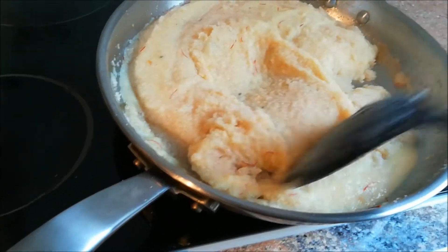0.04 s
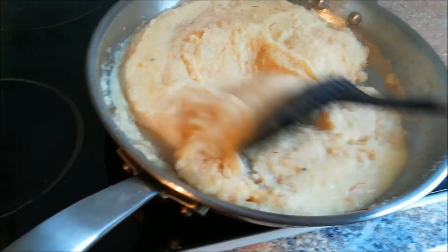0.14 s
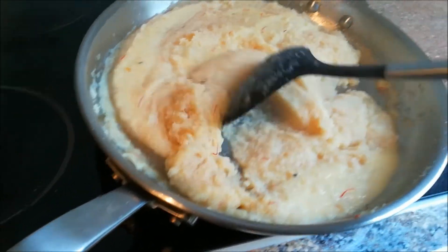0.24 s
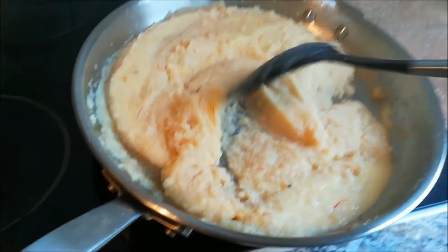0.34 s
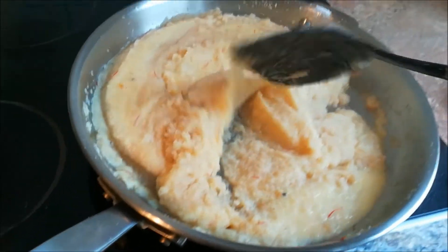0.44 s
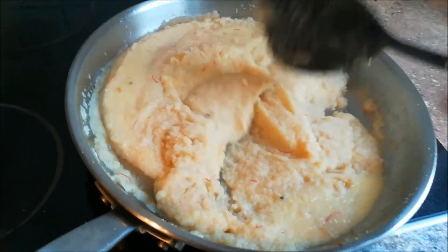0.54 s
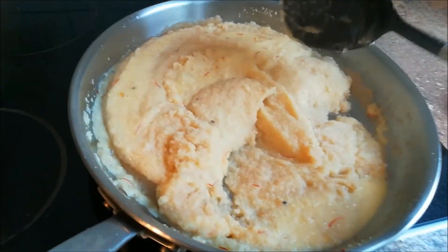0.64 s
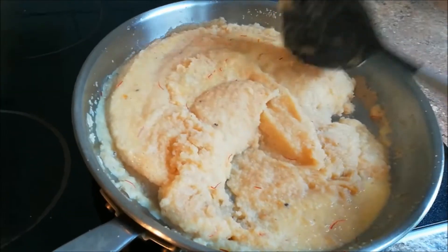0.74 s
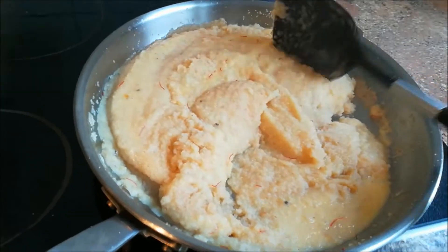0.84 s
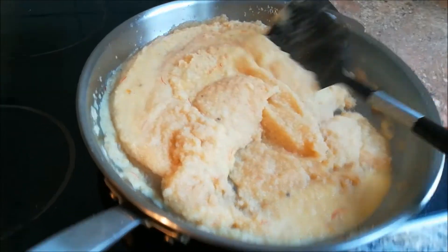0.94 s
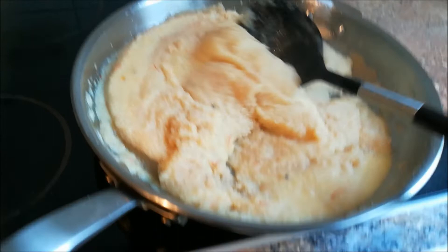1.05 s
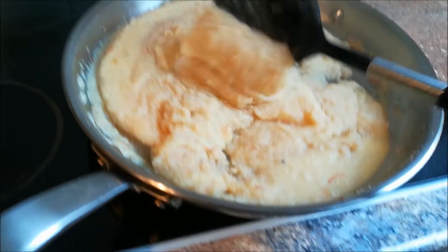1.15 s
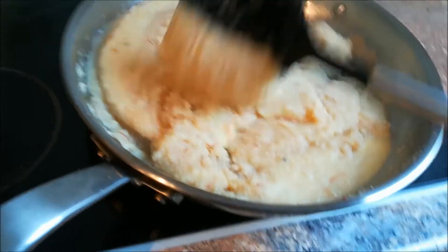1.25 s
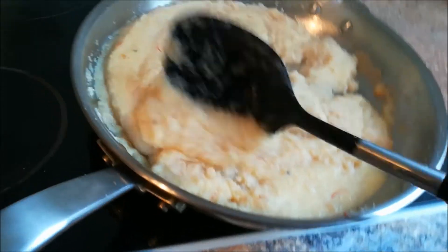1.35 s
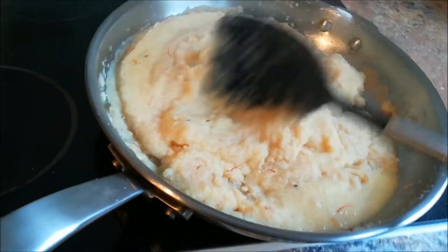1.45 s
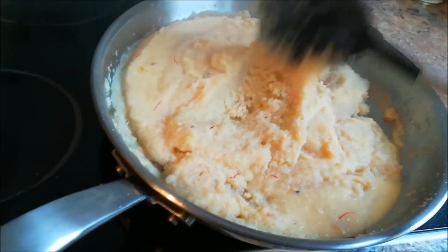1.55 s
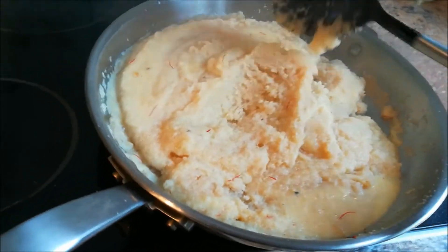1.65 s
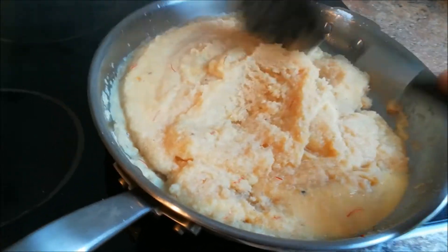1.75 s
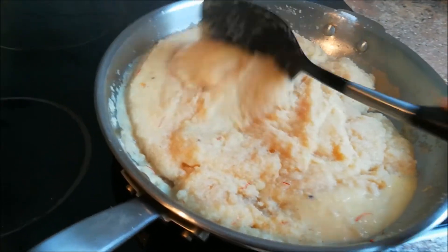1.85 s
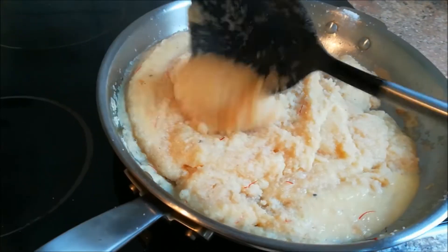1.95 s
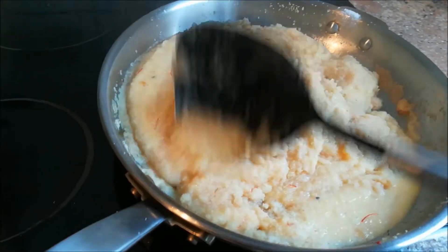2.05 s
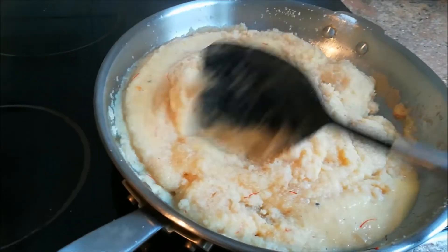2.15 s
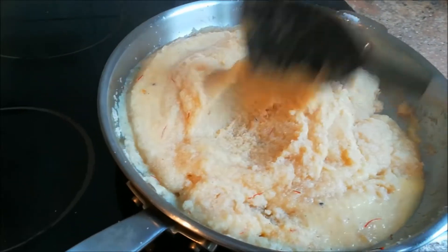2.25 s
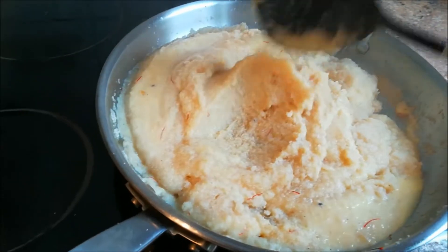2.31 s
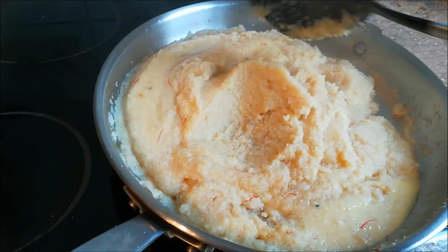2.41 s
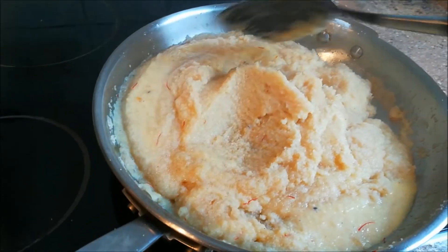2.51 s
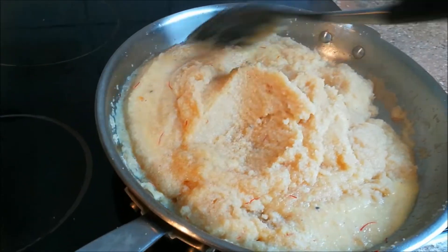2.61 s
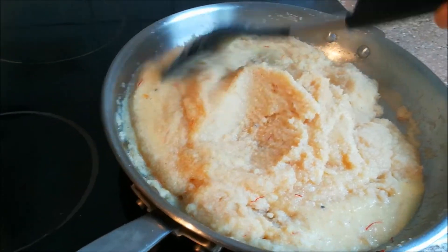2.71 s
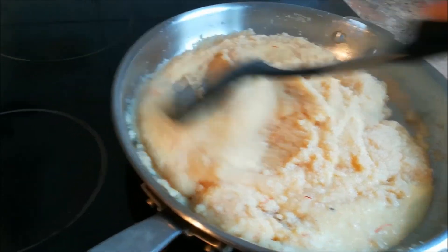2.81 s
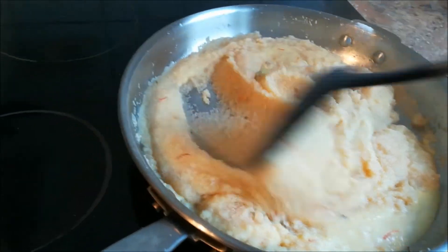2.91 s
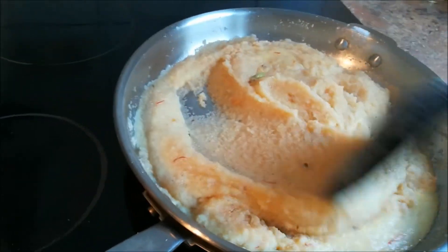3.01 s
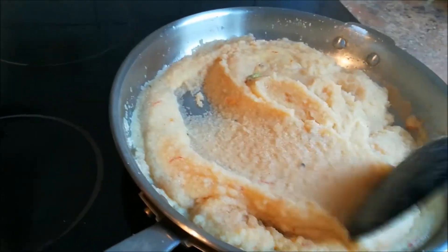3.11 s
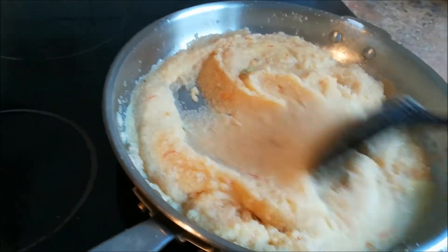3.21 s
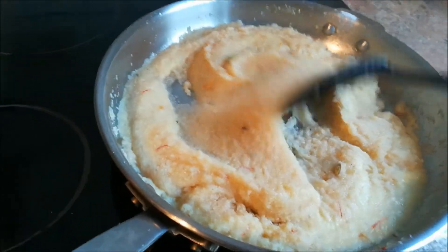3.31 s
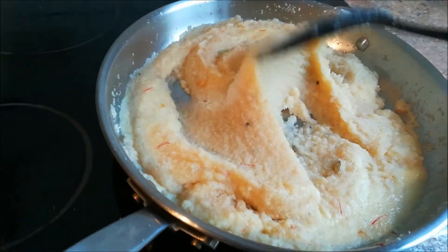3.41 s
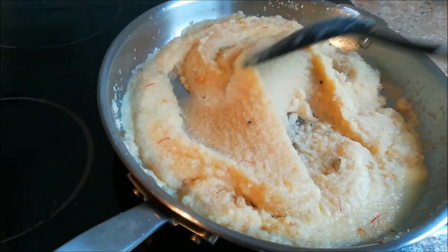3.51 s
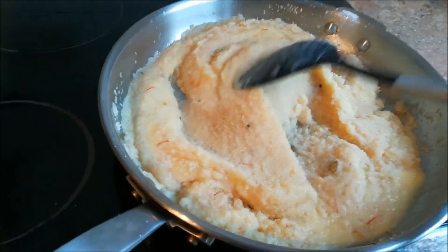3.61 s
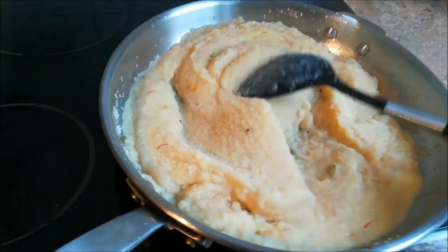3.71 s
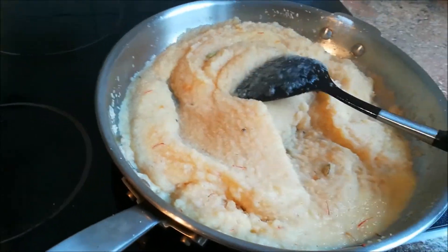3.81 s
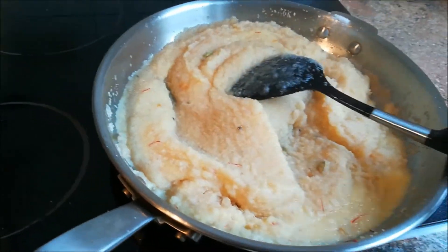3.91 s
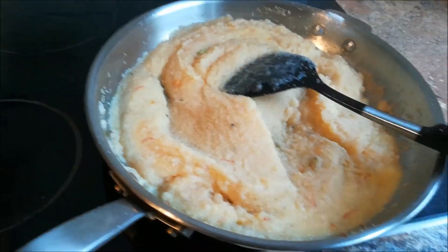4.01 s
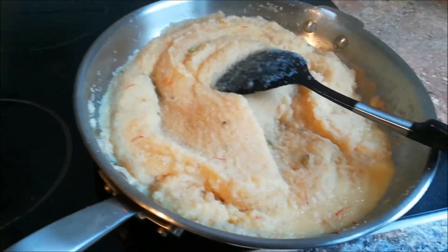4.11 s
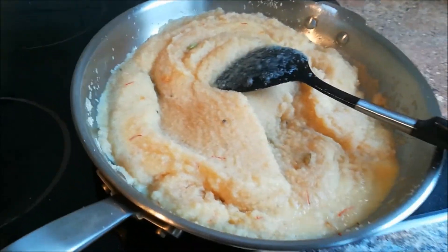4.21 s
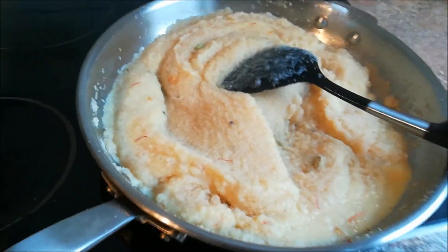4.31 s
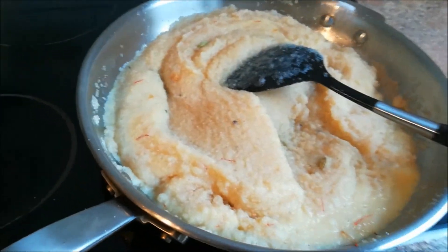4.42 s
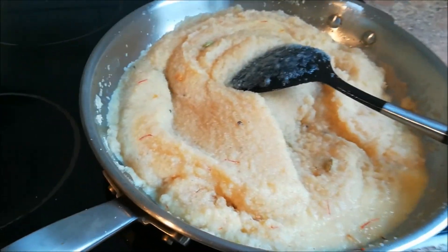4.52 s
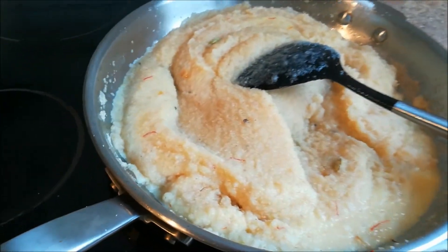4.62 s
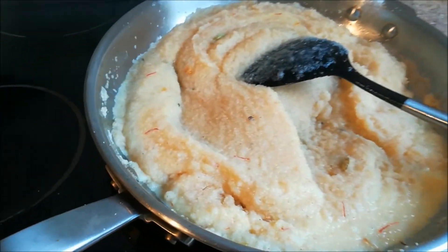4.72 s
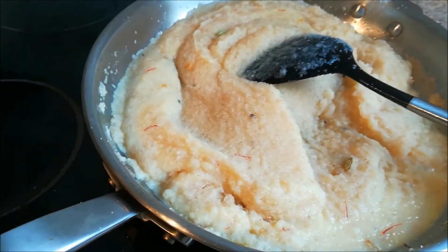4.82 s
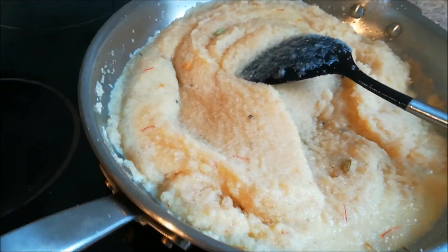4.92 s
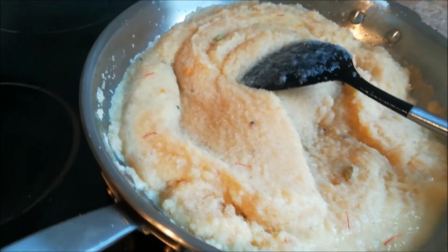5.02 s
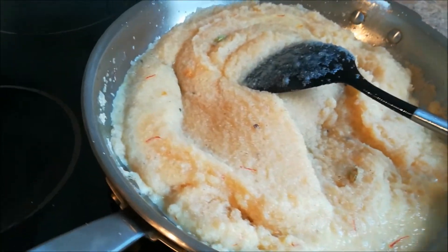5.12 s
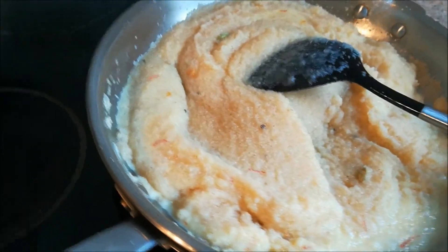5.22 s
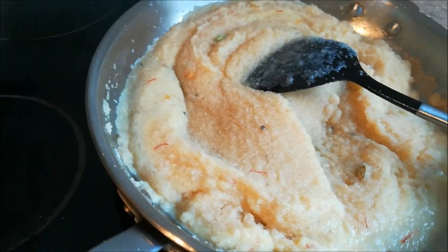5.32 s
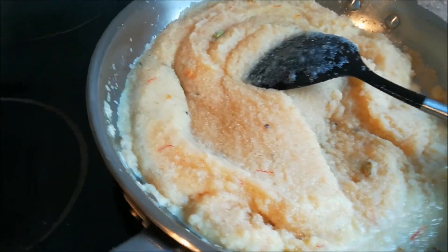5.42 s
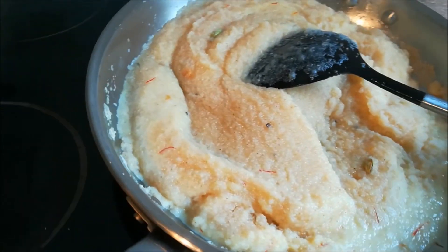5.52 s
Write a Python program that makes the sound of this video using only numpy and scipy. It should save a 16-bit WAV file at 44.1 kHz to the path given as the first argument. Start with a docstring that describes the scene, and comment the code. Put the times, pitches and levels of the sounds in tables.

```python
"""Pudding folded with a plastic spoon in a steel pan, in a small hard kitchen, over fan and fridge hum, whine and air.
From the start the pudding smears (tiny ringing pockets) and ticks (short filtered snaps); five knocks of the spoon,
from 0.16 to 3.24 s, are a noisy crack with damped pan modes; soft low thuds (dying sines) come at 0.17, 3.26 and 3.9 s.
Squelches and squeaks swell from 1.1 s on; a sizzle swells at 3.5 s. Then the pudding rests more quietly, the hum
shifts its balance, and squelches near 4.8 and 5 s lead into even runs of ticking and a last squeak at 5.3 s."""
import sys
import numpy as np
from scipy import signal
from scipy.fft import rfft, irfft
from scipy.io import wavfile

SR = 44100
rng = np.random.default_rng(int(sys.argv[2]) if len(sys.argv) > 2 else 0)


def put_to_file(sound):
    """Save the sound as 16-bit audio at rate SR, in the file named by the first command-line argument."""
    columns = np.atleast_2d(sound).T  # one column per channel
    safe = np.clip(columns, -1, 1)
    whole_steps = np.round(safe * 32767)
    wavfile.write(sys.argv[1], SR, whole_steps.astype(np.int16))


def elevation(decibels):
    """Turn decibel levels (scalar or array-like) into linear amplitude ratios."""
    levels = np.asarray(decibels, float)
    return 10 ** (levels / 20)


N = 244745

FRIDGE_HZ = 49.29   # speed of the fridge motor, turns per s
# stereo balance of diffuse sound: (frequency [Hz], left minus right [dB])
DIFFUSE_BALANCE = [(60, -2), (130, 9), (290, 1), (640, -2.5), (1410, -0.5), (3100, 4), (6820, 2.5),
                   (15000, -5)]
# stereo balance of the pan: (frequency [Hz], left minus right [dB])
PAN_BALANCE = [(60, 0), (130, 2), (290, -12.5), (640, -12), (1410, 0.5), (3100, 12.5), (6820, 5.5),
               (15000, -1.5)]


def rms_one(x):
    """Scale to rms 1."""
    return x / np.sqrt(np.mean(x ** 2) + 1e-20)


def in_time(rows):
    """Columns of a curve table, sample by sample."""
    s, *columns = np.transpose(rows)
    return [np.interp(np.arange(N) / SR, s, column) for column in columns]


def at_hz(points, hz):
    """A table read on a log-frequency axis."""
    table_hz, values = np.array(points).T
    return np.interp(np.log(hz), np.log(table_hz), values)


def drift(rate_hz):
    """Slow random wandering of spread 1: noise at a fortieth of the sample rate, smoothed by a double pole."""
    r = np.exp(-80 * np.pi * rate_hz / SR)
    noise = rng.standard_normal(N // 40 + 4002)
    slow = signal.lfilter([1], [1, -2 * r, r * r], noise)[4000:]   # skip the filter's run-in
    return np.interp(np.arange(N) / 40, np.arange(len(slow)), rms_one(slow - slow.mean()))


def ring(clicks, hz, t60):
    """A two-pole resonance: a unit click sets a sine ringing that falls 60 dB in t60 seconds."""
    r, w = elevation(-60 / (t60 * SR)), 2 * np.pi * hz / SR
    return signal.lfilter([0, np.sin(w)], [1, -2 * r * np.cos(w), r * r], clicks + 1e-18)


def tone(turns, level_db):
    """A sine of given rms level following a phase in turns."""
    return np.sqrt(2) * elevation(level_db) * np.sin(2 * np.pi * (turns + rng.random()))


def coloured(x, points):
    """Minimum-phase filter with the given (Hz, dB) response, so that nothing sounds early."""
    size = x.shape[-1]
    bins_hz = np.maximum(np.arange(size // 2 + 1) * SR / size, 1)
    cepstrum = irfft(at_hz(points, bins_hz) * np.log(10) / 20, size)
    cepstrum[1:size // 2] *= 2
    cepstrum[size // 2 + 1:] = 0
    return irfft(rfft(x) * np.exp(rfft(cepstrum)), size)


def swell(s, rise_s, fall_s, db):
    """Power that grows to a peak and dies away, both exponentially; the times are those of amplitude to 1/e."""
    t = np.arange(N) / SR - s
    return elevation(db) ** 2 * np.exp(2 * np.where(t < 0, t / rise_s, -t / fall_s))


def mixed(parts):
    """Level in dB and pitch of (power, Hz) parts: the loudest pulls the pitch."""
    power = sum(p for p, hz in parts)
    return 10 * np.log10(power), np.exp(sum(p * np.log(hz) for p, hz in parts) / power)


def lean(table, hz):
    """Left and right gains at a pitch."""
    return elevation(np.array([[.5], [-.5]]) * at_hz(table, hz))


def diffuse_bands(length, low_hz, high_hz):
    """Third-octave bands of stereo noise, each with its own likeness and balance of left and right."""
    # edges of the third-octave bands: (frequency [Hz])
    edges_hz = 20 * 2 ** np.arange(0, 9.9, 1 / 3)
    # left-right likeness of diffuse sound: (frequency [Hz], correlation [-1 to 1])
    likeness = [(60, 1.0), (130, 0.98), (290, 0.56), (640, -0.32), (1410, 0.51), (3100, -0.39),
                (6820, -0.15), (15000, -0.58)]
    white = rng.standard_normal((2, 2, length))
    for k, (low, high) in enumerate(zip(edges_hz, edges_hz[1:])):
        if low_hz < low < high_hz:
            band = signal.butter(2, [low, high], "band", fs=SR, output="sos")
            mid, side = signal.sosfilt(band, white[k % 2])
            hz = np.sqrt(low * high)
            alike = np.clip(at_hz(likeness, hz), -1, 1)
            stereo = np.sqrt(1 + alike) * mid + np.sqrt(1 - alike) * side * [[1], [-1]]
            yield hz, lean(DIFFUSE_BALANCE, hz) * stereo


def coloured_noise(spectrum, patchy_db, rate_hz):
    """Diffuse noise whose bands flicker partly together; rms 1."""
    together = drift(rate_hz)
    total = 0
    for hz, band in diffuse_bands(N, spectrum[0][0], spectrum[-1][0]):
        flicker_db = patchy_db * (.5 * together + drift(rate_hz))
        total = total + elevation(at_hz(spectrum, hz) + flicker_db) * band
    return rms_one(total)


def room_rumble():
    """Low air of the room: diffuse noise with slowly flickering bands."""
    # colour of the rumble: (frequency [Hz], relative level per Hz [dB])
    rumble_spectrum = [(12, -31), (20, -6), (63, -10.5), (98, -27), (150, -12.5), (188, -20), (270, -18.5),
                       (441, -28), (664, -24.5), (721, -27), (1000, -33), (1300, -86), (2200, -120)]
    return elevation(-66.5) * coloured_noise(rumble_spectrum, patchy_db=1.5, rate_hz=3.5)


def fine_hiss():
    """Steady fine hiss: diffuse noise whose bands hardly flicker."""
    # colour of the hiss: (frequency [Hz], relative level per Hz [dB])
    hiss_spectrum = [(530, -45.5), (900, -9.5), (1010, -2.5), (1790, -6), (1970, -7.5), (2820, -3),
                     (4430, -6.5), (6490, -9), (7310, -8.5), (10000, -13.5), (15500, -17)]
    return elevation(-72.5) * coloured_noise(hiss_spectrum, patchy_db=.3, rate_hz=8)


def whine():
    """Slot whine: thin high lines one motor turn apart, wavering in level, louder on the left."""
    # lines of the whine: (order of fridge speed, rms level before wavering and stereo balance [dB])
    slot_lines = [(128, -93), (129, -93.5), (130, -87), (131, -95)]
    turns = FRIDGE_HZ * np.arange(N) / SR
    lines = sum(tone(round(k) * turns, level_db + 2.0 * drift(0.98)) for k, level_db in slot_lines)
    return elevation([[3], [-5]]) * lines


def hum():
    """Orders of the sagging fan speed, the fridge motor and other faint tones: wavering sines alike left and right."""
    # the fan sags a little: (time [s], speed [turns per s])
    fan_speed = [(0, 28.42), (1.8, 28.36), (3.4, 28.3), (5.55, 28.2)]
    # balance of the hum, in which the third order fades and returns: (time [s], share of the shift [0-1])
    hum_shift = [(0, 0.08), (3.7, 0), (4.3, 0.87), (4.6, 0.95), (5.1, 0.5), (5.55, 0.22)]
    # low fan orders: (order, rms level before wavering and shift [dB], wavering [dB], change at full shift [dB])
    fan_orders = [(1, -61.5, 0.5, 4.5), (2, -67.5, -1, 5.5), (3, -57.5, 0.5, -11), (4, -73, 2.5, 2.5),
                  (5, -70.5, 1.5, 2), (6, -71, 5.5, -14.5)]
    # upper fan orders: (order, rms level before wavering [dB])
    upper_orders = [(7, -86.5), (8, -78), (9, -82.5), (10, -83.5), (12, -87)]
    # steady hum lines, the fridge motor and other faint tones:
    # (frequency [Hz], rms level before wavering [dB], wavering [dB])
    steady_lines = [(FRIDGE_HZ, -64, 1.0), (51.41, -67, 3.0), (154.2, -78, 3.0), (503, -92, 3.0),
                    (722, -91, 3.0)]
    turns, t = np.cumsum(in_time(fan_speed)[0]) / SR, np.arange(N) / SR
    shift, = in_time(hum_shift)
    total = np.zeros(N)
    for k, level_db, waver_db, shift_db in fan_orders:
        total += tone(round(k) * turns, level_db + waver_db * drift(0.4) + shift_db * shift)
    for k, level_db in upper_orders:
        total += tone(round(k) * turns, level_db + 3.0 * drift(.6))
    for hz, level_db, waver_db in steady_lines:
        total += tone(hz * t, level_db + waver_db * drift(0.33))
    return total


def kitchen(x):
    """Dense reflections that build up in a few ms and die band by band."""
    # reverberation time: (frequency [Hz], fall by 60 dB [s])
    room_t60 = [(150, 0.42), (350, 0.44), (1000, 0.37), (2500, 0.49), (5000, 0.49), (9000, 0.068)]
    # colour of the reflections: (frequency [Hz], relative level [dB])
    room_colour = [(150, -2.5), (250, 6), (340, 10.5), (480, 13), (750, 10), (1100, 3.5), (1700, -1.5),
                   (3000, 8.5), (5000, 1.5), (7000, 3.5), (10000, 2)]
    t = np.arange(SR // 2) / SR
    tail = 0
    for hz, band in diffuse_bands(len(t), 70, 12000):
        tail = tail + elevation(at_hz(room_colour, hz) - 60 * t / at_hz(room_t60, hz)) * band
    tail = tail * (1 - np.exp(-(t / 0.002) ** 2))
    return signal.fftconvolve(x[None], tail / np.sqrt(np.sum(tail ** 2)), axes=1)[:, :N]


def thuds():
    """The pan rocks on the hob: a soft low push, a few cycles long, with a shorter overtone."""
    # rocks of the pan: (time [s], relative level [dB], frequency [Hz])
    rocks = [(0.167, -46, 133.5), (3.261, -45.5, 140), (3.875, -45, 125.8), (3.919, -54, 130.3)]
    out = np.zeros(N)
    for s, level_db, hz in rocks:
        t = np.maximum(np.arange(N) / SR - s + 0.00793, 0)   # the push starts just ahead of its time
        push = t / 0.007 * np.exp(-t / 0.0073)
        overtone_push = t / 0.0029 * np.exp(-t / 0.0038)
        out += elevation(level_db + 12.5) * push * np.sin(2 * np.pi * hz * t)
        out += elevation(level_db - 2.0) * overtone_push * np.sin(2 * np.pi * 2.246 * hz * t)
    return out


def squeaks():
    """Noise in a narrow resonance, swelling for a moment."""
    # brief squeaks: (time of peak [s], rise [s], fall [s], level [dB], frequency [Hz])
    squeak_rows = [(1.38, .02, .03, -72, 2650), (1.57, 0.033, .02, -70, 2680),
                   (5.305, .004, .012, -74, 1530)]
    noise = rng.standard_normal(N)
    return sum(np.sqrt(swell(*row[:4])) * rms_one(ring(noise, row[4], 0.027)) for row in squeak_rows)


def pockets(level_db, centre_hz, low_hz, high_hz, per_s, octaves, clump_db):
    """Tiny air pockets tear open, in clumps if clump_db, and ring a few cycles; sizes crowd round a moving pitch."""
    sizes = elevation(4.0 * np.minimum(rng.exponential(1, (2, N)), 5)) * rng.choice([-1, 1], (2, N))
    born = rng.random((2, N)) < per_s * elevation(clump_db * drift(30)) / SR
    pitch_class = rng.integers(0, 12, size=(2, N))
    out, power = 0, 0
    for k, hz in enumerate(np.geomspace(low_hz, high_hz, num=12)):
        share = 0.066 + np.exp(-.5 * (np.log2(hz / centre_hz) / octaves) ** 2)
        ringing = rms_one(ring(sizes * born * (pitch_class == k), hz, 13.0 / hz))
        out = out + share * lean(DIFFUSE_BALANCE, hz) * ringing
        power = power + share ** 2
    # wet walls dull each snap
    soft_top = signal.butter(2, [1.0 * low_hz, 1.6 * high_hz], "band", fs=SR, output="sos")
    return elevation(level_db) * signal.sosfilt(soft_top, out / np.sqrt(power))


def smear():
    """Crackle and fizz of the pudding: a slow bed of tearing pockets with squelches and a sizzle on it."""
    # pudding worked by the spoon, quieter once it rests: (time [s], crackle level [dB], fizz level [dB])
    working = [(0, -71, -67), (.5, -74, -70), (.85, -74.5, -71), (1.3, -71.5, -68), (1.8, -71, -69),
               (2.3, -71.5, -70), (2.65, -77, -72.5), (3.1, -72, -69), (3.6, -76.5, -71.5),
               (4.0, -80.5, -79.5), (4.6, -82.5, -76.5), (5.1, -78.5, -70.5), (5.55, -78.5, -84)]
    # wet squelches as the pudding tears or steam escapes:
    # (time of peak [s], rise [s], fall [s], level [dB], frequency [Hz])
    squelches = [(1.086, 0.066, 0.038, -57.5, 1820), (1.54, .1, 0.063, -68, 2660),
                 (2.376, 0.061, .05, -71, 2600), (4.796, 0.01, 0.085, -61, 3260),
                 (5.0, 0.0154, 0.14, -69.5, 2620)]
    # bared pan bottom sizzles: (time of peak [s], rise [s], fall [s], level [dB], frequency [Hz])
    sizzle = (3.53, .04, .22, -67, 5400)
    crackle_db, fizz_db = in_time(working)
    bursts = [(swell(*row[:4]), row[4]) for row in squelches]
    crackle = mixed([(elevation(crackle_db) ** 2, 2550)] + bursts)
    # each squelch brings some fizz, 5 dB below it
    fizz_power = elevation(fizz_db) ** 2 + elevation(-5) ** 2 * sum(p for p, hz in bursts)
    fizz = mixed([(fizz_power, 6500), (swell(*sizzle[:4]), sizzle[4])])
    return (pockets(*crackle, low_hz=890, high_hz=4156, per_s=3500, octaves=.45, clump_db=2.0)
            + pockets(*fizz, low_hz=4140, high_hz=9430, per_s=9000, octaves=0.41, clump_db=0.0))


def all_ticks():
    """The clear ticks, the even runs and the faint ones that come by chance."""
    # sticky pudding lets go with a tick, the clearest ones: (time [s], peak level before the stereo balance [dB],
    # reference frequency of the colour [Hz], colour at 6500 Hz against that [dB])
    clear_ticks = [(0.6675, -59, 2300, -20), (0.8844, -52, 5000, 3), (1.0177, -46.5, 2400, -11),
                   (1.312, -62, 2000, -11), (1.7474, -49.5, 3270, 1), (1.8148, -60, 4914, -1),
                   (2.3705, -52, 3800, -1), (2.3872, -53, 2160, -12), (2.4298, -47.5, 3500, -1),
                   (2.5291, -51, 2980, -6), (2.617, -54, 2400, -6.5), (2.7098, -52, 3550, -4),
                   (2.8772, -44, 4800, -3.5), (3.0125, -53.5, 5950, 4), (3.1173, -54, 2233, -4.5),
                   (3.9505, -53.5, 4500, 2), (4.221, -61, 1990, -26), (4.744, -52.5, 2690, -15),
                   (5.2876, -50, 1330, -16)]
    # evenly spaced ticking: (time of the first [s], number of ticks, peak level before the stereo balance [dB])
    tick_runs = [(4.8942, 2, -52.5), (5.1568, 4, -61.5), (5.3436, 2, -55), (5.4112, 4, -60.5)]
    run_step_s, per_s, faint_db, faint_hz = 0.0348, 8.2, -63.5, 3300
    runs = [(s + run_step_s * k, db, faint_hz, -4) for s, count, db in tick_runs for k in range(round(count))]
    gap, size, pitch = rng.random((60, 3)).T
    s = np.cumsum(-np.log(1 - gap)) / per_s
    peak_db = faint_db + 6.0 * (size - .5)
    hz = faint_hz * 2 ** (1.4 * (pitch - .5))
    faint = zip(s, peak_db, hz, -4.0 + 0 * s)
    return clear_ticks + runs + [row for row in faint if row[0] * SR < N - 1024]


def ticks():
    """Each tick is a very short snap, coloured round its pitch, with its own reach into the treble."""
    out = np.zeros((2, N))
    for s, peak_db, hz, top_db in all_ticks():
        at = round(s * SR)
        click = rng.standard_normal(1024) * np.exp(-np.arange(1024) / 4)
        colour = [(hz / 3, -30), (0.76 * hz, -3), (hz, 0), (6500, top_db), (9500, top_db - 22.5)]
        tick = coloured(click, colour)
        out[:, at:at + 1024] += elevation(peak_db) * lean(PAN_BALANCE, 3100) * tick / np.abs(tick).max()
    return out


def knocks():
    """The spoon edge strikes damped pan modes twice, with a noisy crack, coloured by how hard and where it lands.
    Returns the near sound and the bare blow that the walls send back."""
    # spoon on pan: (time [s], relative level [dB], bass colour [dB], colour near 2800 Hz [dB],
    # colour near 6200 Hz [dB], frequency favoured by the spot hit [Hz])
    hits = [(0.155, -33.5, -11.5, -9, -9, 1205), (0.9365, -46.5, -3.5, -11.5, -10.5, 1770),
            (1.8696, -23.5, -12.5, -12, -17, 978), (2.7518, -37, -7, -33, -30.5, 540),
            (3.241, -25.5, -16.5, -13.5, -23, 1177)]
    # where the colour of a knock is set: (frequency [Hz])
    bands_hz = [150, 260, 400, 520, 760, 1000, 1900, 2500, 3500, 5000, 7300, 10000, 14000]
    # modes of the pan bottom damped by pudding: (frequency [Hz], relative level [dB], fall by 60 dB [s])
    modes = [(341.4, -2, 0.092), (421, -6.5, 0.11), (507, -7.5, 0.057), (831, -3.5, 0.037),
             (1100, -4.5, 0.023), (1314, -2.5, 0.027), (1644, -7.5, 0.024), (1980, -7, 0.045),
             (2386, 2.5, 0.037), (2600, 4, 0.02), (2870, 9, 0.019), (3460, 6, 0.014), (3950, -1, 0.03),
             (4400, 14, 0.0033), (6030, -10, 0.012), (7050, 7, 0.02)]
    near, bare, t = np.zeros((2, N)), np.zeros(N), np.arange(8192) / SR
    half = len(t) // 2
    balance = lean(PAN_BALANCE, np.maximum(np.arange(4097) * SR / 8192, 1))
    clicks = np.zeros(len(t))
    clicks[[0, round(0.0012 * SR)]] = 1, .6   # the edge lands again after 1.2 ms
    for s, level_db, low, high, top, spot_hz in hits:
        levels = [low - 25, low + 5, low + 5, low + 0.5, low - 3, 0, 0,
                  high, high, top - 3, top - 3, top - 28, top - 45]
        colour = list(zip(bands_hz, levels))
        spot = [(spot_hz / 1.17, 0), (spot_hz, 7.5), (spot_hz * 1.17, 0)]
        crack = t / 0.0015 * np.exp(-t / 0.00064) * elevation(25.0)
        blow = rng.standard_normal((2, len(t))) * crack
        blow[1] = .8 * blow[0] + .6 * blow[1]   # the crack is largely alike left and right
        for k, (hz, mode_db, t60) in enumerate(modes):
            chance_db = rng.normal(0, 1.8)
            rung = (-1) ** k * elevation(mode_db + chance_db + 2) * ring(clicks, hz, t60)
            lag = round(rng.uniform(0.55, 1.5) * 0.00008 * SR)   # each mode comes a little late on the left
            blow += [np.roll(rung, lag), rung]
        at = round(s * SR)
        for side in range(2):
            struck = coloured(coloured(blow[side], spot), colour)
            near[side, at:at + half] += elevation(level_db) * irfft(rfft(struck) * balance[side])[:half]
        bare[at:at + len(t)] += elevation(level_db) * coloured(1. * (t == 0), colour)
    return near, bare


def scene():
    """Near sounds of the pan with their room tail, over hum, whine and air."""
    (blows, bare), small, low = knocks(), ticks(), thuds()
    wet = kitchen(elevation(34) * bare + elevation(-2.5) * small.mean(axis=0) + elevation(-4.5) * low)
    pudding = smear() + squeaks()
    background = hum() + whine() + room_rumble() + fine_hiss()
    return blows + small + low + wet + pudding + background


def roll_off(x):
    """The treble ends steeply here."""
    return signal.sosfilt(signal.butter(12, 15620, fs=SR, output="sos"), x)


def record(dry):
    """Turn the finished mix into the sound that is heard."""
    return roll_off(dry)


dry = scene()
out = record(dry)
put_to_file(out)
```